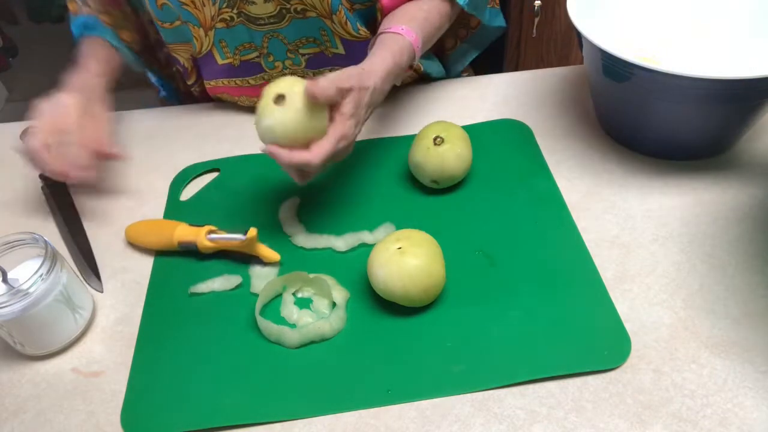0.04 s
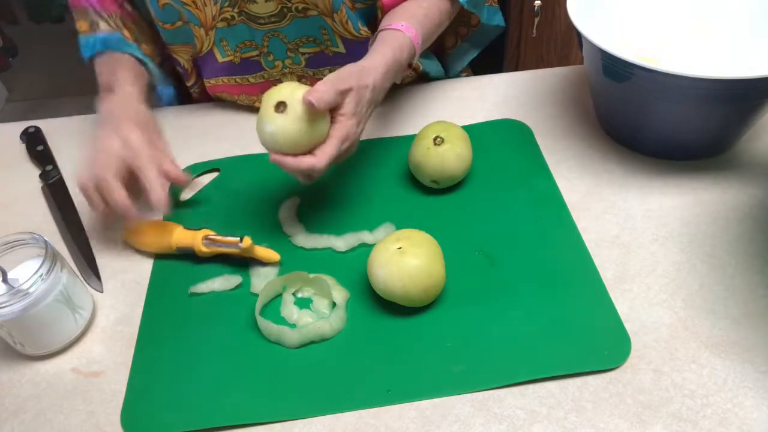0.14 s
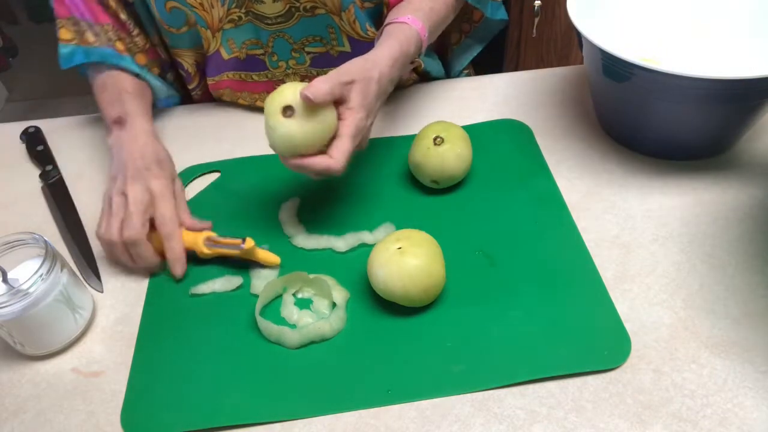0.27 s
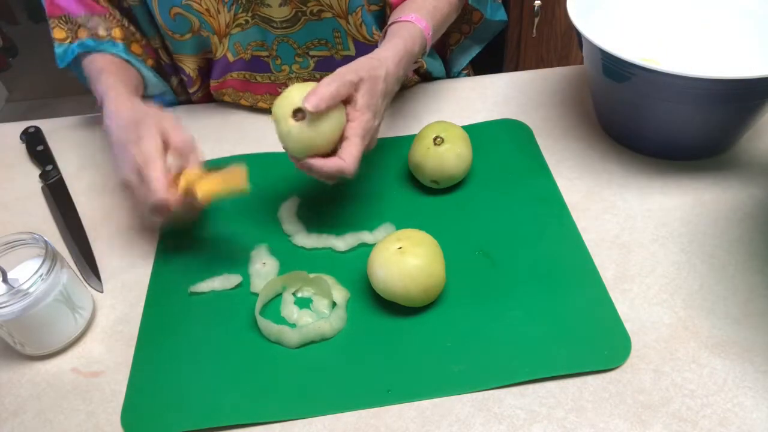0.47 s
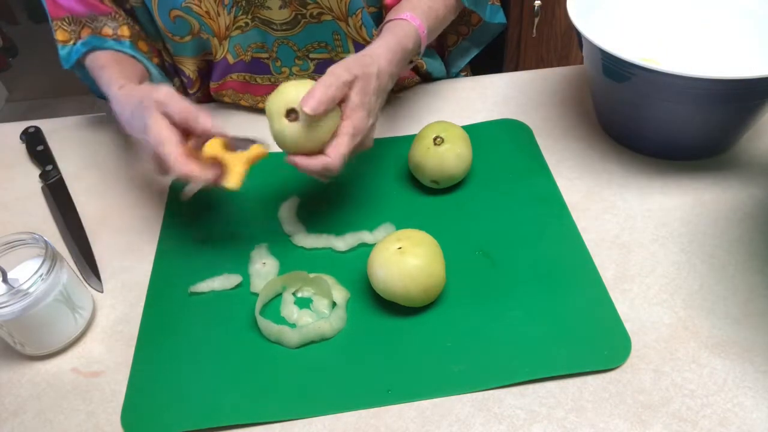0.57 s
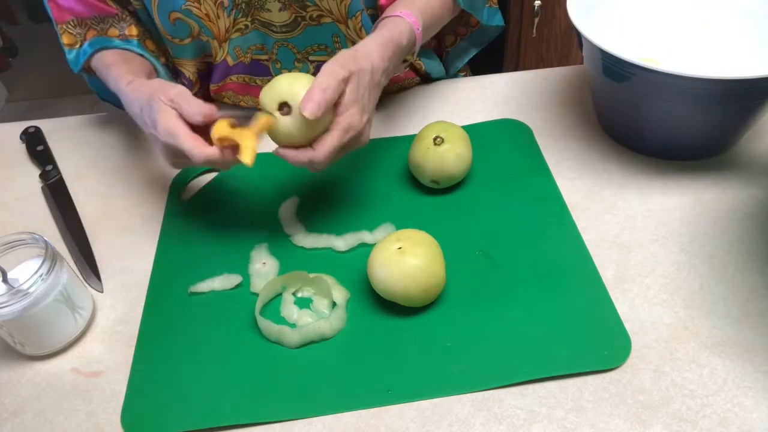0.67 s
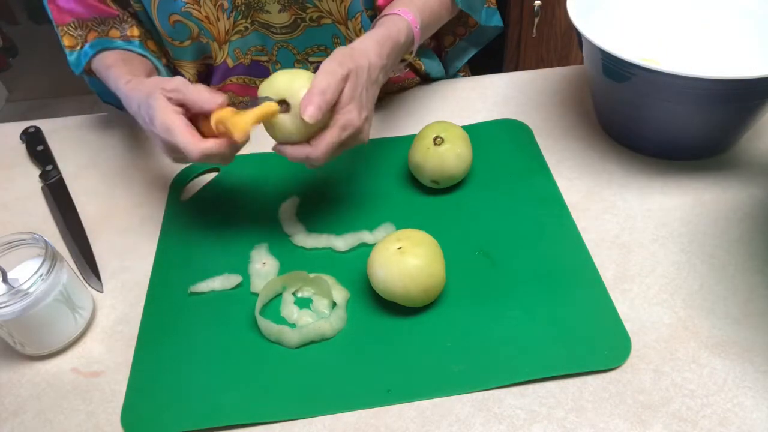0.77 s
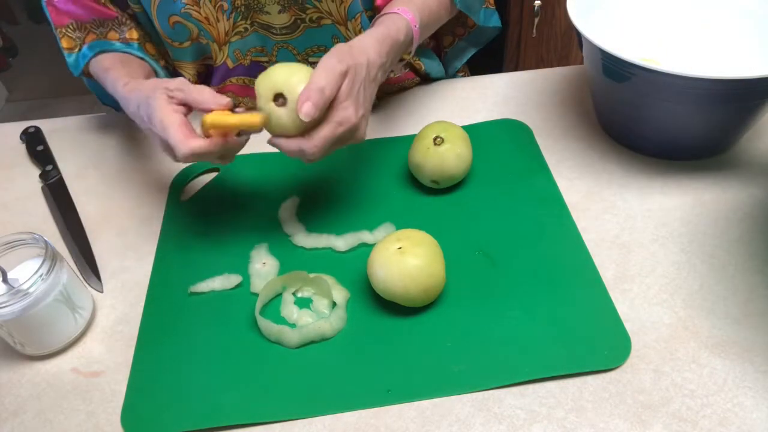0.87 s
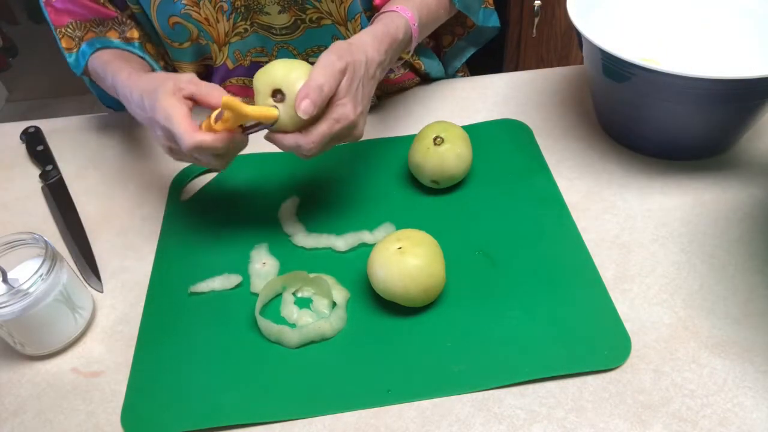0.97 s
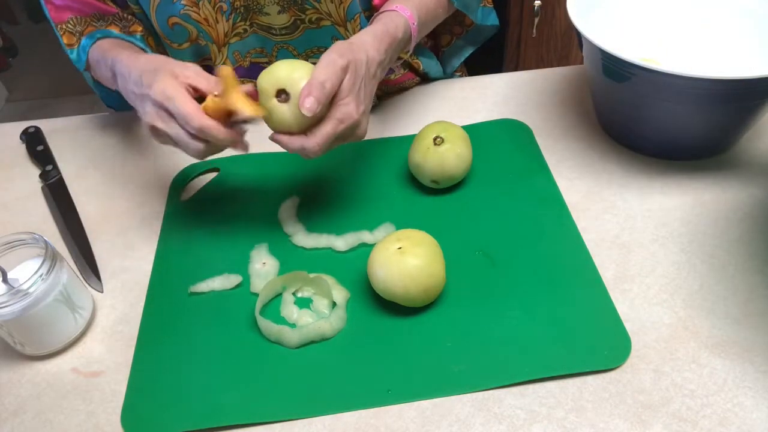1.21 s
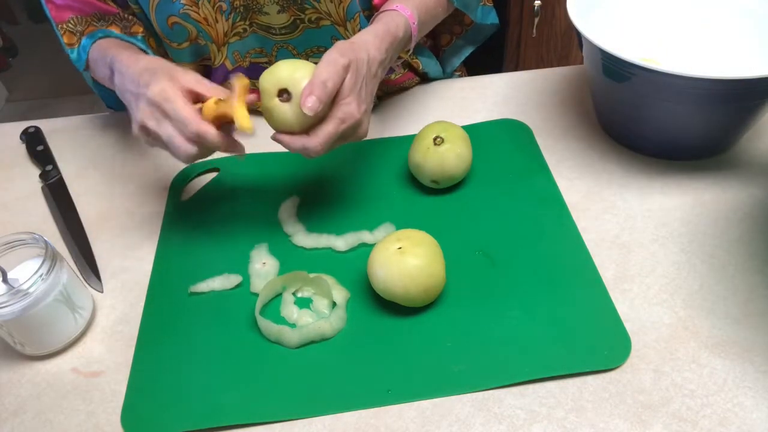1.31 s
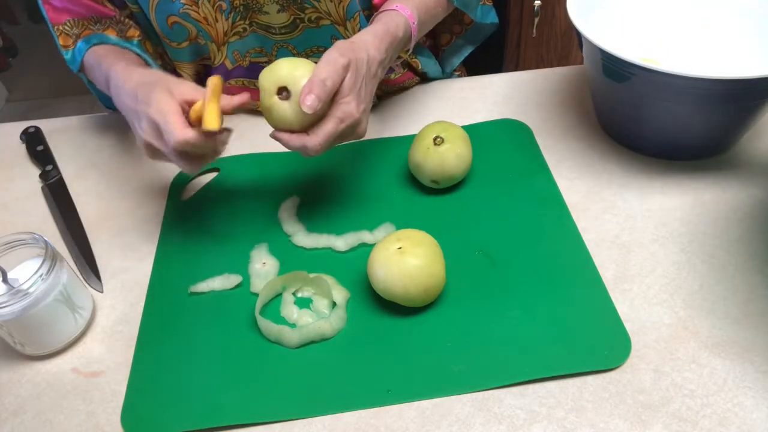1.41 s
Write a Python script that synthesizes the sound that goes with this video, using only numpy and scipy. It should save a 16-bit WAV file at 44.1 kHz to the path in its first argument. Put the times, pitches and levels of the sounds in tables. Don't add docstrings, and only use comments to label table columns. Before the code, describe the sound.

Peeler lifted from a board: sharp clack, tiny squeak, then faint metallic blade ticks in hand

```python
import sys
import numpy as np
from scipy import signal
from scipy.fft import rfft, irfft
from scipy.io import wavfile
from scipy.ndimage import uniform_filter1d

SR = 44100
rng = np.random.default_rng(int(sys.argv[2]) if len(sys.argv) > 2 else 0)


def level_to_linear(level):
    exponent = np.asarray(level, float) / 20
    return 10 ** exponent


def transcribe(signal):
    frames = np.atleast_2d(signal).T
    limited = np.clip(frames, -1, 1)
    pcm = np.round(limited * 32767).astype(np.int16)
    wavfile.write(sys.argv[1], SR, pcm)


N = 63945
T = np.arange(N) / SR

# [t/s, level/dB, crack level/dB]
KNOCKS = [
    (.2163, -30, -27),
    (.2174, -21, -34),
    (.2218, -27, -36),
    (.2275, -32, -46),
    (.2415, -38, -38),
    (.2535, -31, -36),
    (.265, -35, -44),
    (.282, -42, -60),
]
# [f/Hz, level/dB, T60/s]
BOARD_MODES = [(890, -26, 0.047), (1121, 2, 0.023), (1300, -2, 0.071), (1804, -15, 0.075),
               (2000, -10.5, 0.019), (2500, -26, 0.015), (3210, -9, 0.011), (3580, -25, 0.0097),
               (4650, -13.5, 0.024), (5880, -13.5, .008), (7250, -23, 0.021), (9700, -34, 0.0031)]
BOARD_DB, KNOCK_SPREAD_DB, KNOCK_DETUNE = -4, 2, .025
BEND_CYCLES = 0.35
CRACK_DB, CRACK_S, CRACK_HZ = -3.5, 0.00088, 3270

# [t/s, level/dB]
THUMPS = [
    (.2185, -34),
    (.2265, -43),
    (.254, -37),
    (.278, -43),
]
# [f/Hz, level/dB, T60/s]
COUNTER_MODES = [(151.6, 1, 0.069), (261, -2, 0.061), (351.6, 2, 0.049), (550, -5.5, 0.027)]

# [t/s, slip rate f/Hz, level/dB]
SQUEAK = [
    (.2405, 1100, -40),
    (.2432, 1220, -29),
    (.2447, 1380, -20),
    (.2478, 1480, -17.5),
    (.2497, 1530, -21),
    (.2518, 1520, -32),
    (.2547, 1400, -20),
    (.2568, 1490, -29),
    (.265, 1520, -38),
]
HARMONIC_DB = [-20.5, -21, -17.5, -23]
SQUEAK_JITTER, SHRILL_ABOVE_HZ, SHRILL_SPAN_HZ = 0.034, 1430, 122
SQUEAK_DRY_SHARE = .6

# [f/Hz, bandwidth/Hz, level/dB]
SQUEAK_TAIL = [(1508, 44, -2.5), (1558, 95, -6), (1152, 126, -6), (2090, 55, -21), (1286, 150, -10)]
SQUEAK_TAIL_S, SQUEAK_TAIL_DB, SQUEAK_TAIL_T60_S = .258, -41, .38

# [t/s, level/dB, f/Hz]
RATTLES = [(0.2173, -29, 3920), (0.238, -32, 1340), (.241, -28.5, 1970), (.2425, -32, 3970),
           (.2455, -45, 3600), (0.2486, -42, 3120), (.2515, -39, 2000), (0.2533, -34, 1990),
           (0.2533, -43, 4580), (0.2551, -27.5, 1120), (.281, -38, 1190), (0.543, -45, 5760),
           (.5503, -41, 4860), (.559, -40, 5150), (0.5623, -36, 7700), (.5645, -46, 3310),
           (.567, -36.5, 3260), (0.5688, -36, 7700), (0.571, -42, 3320), (0.5713, -36, 5440),
           (0.7313, -54, 4220), (0.7424, -55, 1137), (0.744, -47, 3640), (0.7472, -53, 5240),
           (.7505, -46, 5200), (0.753, -49, 3780), (0.758, -44, 4020), (0.762, -51, 5100),
           (.7638, -42.5, 3750), (.7663, -53, 6500), (.7712, -43, 6000), (0.773, -40, 5230),
           (.7762, -53, 5800), (0.787, -53, 5100), (.7962, -44, 4600), (.803, -42, 5400),
           (0.8107, -54, 5300), (.8135, -48, 5100), (.9982, -62, 4600), (1.0185, -52, 5070),
           (1.025, -52, 5080), (1.025, -54, 1300), (1.0308, -50, 4850), (1.0302, -55, 1100),
           (1.034, -52.5, 3420), (1.039, -51.5, 4800), (1.0388, -54, 1070), (1.047, -61, 3100),
           (1.215, -46, 8800), (1.216, -52, 6800), (1.218, -57, 2530), (1.263, -53, 3570),
           (1.2705, -51, 4430), (1.2755, -56, 6500), (1.3712, -53, 2470), (.887, -51, 3630),
           (0.5147, -50, 3700), (.2172, -39, 4750)]
RATTLE_CYCLES, RATTLE_CLICK_S, RATTLE_CLICK_DB, RATTLE_BODY_DB = 40, 0.00095, -7.5, -2

# [t/s, level/dB, length/s, centre f/Hz]
SCRAPES = [(0.083, -66.5, 0.052, 2520), (0.174, -57, 0.15, 1300), (0.2377, -40.5, 0.016, 3300),
           (0.368, -63, 0.03, 4600), (0.4388, -58, 0.0072, 6200), (0.48, -60, 0.0046, 6900),
           (0.489, -58, 0.028, 6000), (0.508, -54, 0.016, 5040), (0.539, -56, 0.007, 5750),
           (0.551, -60, 0.004, 5400), (0.5583, -49, 0.0074, 5500), (0.5662, -43.5, 0.005, 4760),
           (.669, -61.5, 0.0069, 4240), (0.683, -57, 0.0099, 6500), (0.731, -57, 0.0019, 4530),
           (0.7405, -55, 0.017, 4140), (0.7564, -49, 0.019, 6200), (0.792, -57.5, 0.017, 5650),
           (0.808, -51.5, 0.0056, 6500), (0.8634, -63, 0.0023, 3750), (0.871, -60, 0.02, 4080),
           (1.013, -68, 0.037, 4270), (1.087, -70, 0.029, 2600), (1.213, -60, 0.0061, 7040),
           (1.262, -55.5, 0.02, 6000), (1.338, -66, 0.0018, 13000), (1.368, -61.5, 0.01, 4750),
           (1.402, -67.5, 0.026, 9700), (0.452, -66, 0.012, 5870), (0.775, -60, 0.013, 5050)]
GRAINS_PER_S, GRAIN_DB, SCRAPE_WIDTH, RELEASE_S = 3500, 5, 0.67, 0.006
# [f/Hz, bandwidth/Hz, level/dB]
CHATTER = [(2444, 260, 4), (3120, 170, -5), (3630, 360, -5.5), (4820, 58, -9.5), (5320, 110, -6),
           (6500, 63, -18), (7500, 91, -32), (8460, 41, -9), (11000, 180, -16), (14600, 250, -21)]
CHATTER_DB, CHATTER_SPREAD_DB, SAG_DB = -4, 3, -6.5

# [t/s, level/dB]
TICKS = [(0.37, -56), (0.44, -63), (0.4813, -45.5), (0.489, -44), (0.511, -52), (0.5506, -53),
         (0.682, -43.5), (.7315, -66), (0.748, -43), (0.764, -33), (.772, -50), (0.796, -56), (0.8098, -49),
         (0.8764, -40.5), (.8845, -63), (.998, -60), (1.031, -47), (1.0182, -76), (1.04, -55), (1.217, -44),
         (1.267, -37), (1.271, -61), (1.279, -46.5), (1.418, -42.5), (1.4201, -49)]
TICK_HZ, TICK_WIDTH_HZ, TICK_S = 5500, 4500, .0007
# [f/Hz, T60/s]
BLADE_MODES = [(2490, .045), (3750, .05), (4790, .06), (5185, .065), (5696, .24), (6450, .045), (8580, .03),
               (9165, .3), (9776, .09), (14170, .14), (15580, .15), (6800, .08)]
# [t/s, mode number from 0, level/dB]
PINGS = [(.25, 7, -77), (.441, 11, -75), (.441, 1, -71), (0.443, 6, -66), (.481, 5, -60), (.481, 9, -68),
         (.481, 10, -74), (.494, 3, -56), (.512, 9, -84), (.59, 4, -59.5), (.682, 10, -72), (.747, 3, -47),
         (.747, 1, -63), (.762, 10, -65), (.796, 2, -57), (.813, 3, -60), (.81, 9, -68), (.877, 5, -54.5),
         (0.878, 8, -58), (.877, 9, -67), (.885, 7, -70), (.905, 3, -66), (.905, 4, -69.5),
         (1.217, 0, -55.5), (1.272, 9, -70), (1.29, 4, -80), (1.372, 0, -55), (1.37, 9, -82),
         (.195, 0, -74), (.262, 2, -65)]
PING_ROUGH_DB = 3.5

# [f/Hz, bandwidth/Hz, level/dB]
KNIFE = [(604, 123, 1.5), (410, 140, -4.5), (880, 1360, -5), (2200, 2800, -13), (6000, 6500, -14),
         (12000, 7900, -22)]
KNIFE_DB, KNIFE_T60_S = -51.5, 0.32

# [f/Hz, level/dB per Hz]
AIR = [(30, -28), (60, -1.5), (90, -5.5), (280, 1), (750, -4.5), (1050, -11), (5500, -24), (15500, -36.5)]
AIR_DB = -60
# [f/Hz, level/dB]
HUM = [(60, -74), (119, -67.5)]

ROOM_T60_S, ROOM_TOP_T60_S, ROOM_DB, ROOM_TOP_DB, ROOM_GAP_S = 0.52, 0.33, -18.5, 4.5, 0.0015
MIC_LOW_HZ, MIC_TOP_HZ = 46.4, 15300


def unit(x):
    return x / np.sqrt(np.mean(x ** 2))


def band(x, hz, width_hz):
    hz = min(hz, .4 * SR)
    return signal.lfilter(*signal.iirpeak(hz, hz / min(width_hz, .3 * SR), SR), x)


def ring(start, hz, t60, rise=1e-5):
    u = np.maximum(T - start, 0)
    decay = np.exp(-np.log(1000) * u / t60)
    return np.sin(2 * np.pi * hz * u) * decay * (1 - np.exp(-(u / rise) ** 2))


def walk(rate):
    k = int(SR / rate)
    return unit(uniform_filter1d(uniform_filter1d(rng.standard_normal(N), k), k))


def burst_train(events, decay_s):
    envelope = sum(level_to_linear(db) * (T > s) * np.exp(-np.maximum(T - s, 0) / decay_s) for s, db in events)
    return envelope * np.sign(rng.standard_normal(N))


def board():
    out = np.zeros(N)
    for start, db, _ in KNOCKS:
        for hz, mode_db, t60 in BOARD_MODES:
            level_draw, pitch_draw = rng.standard_normal(2)
            level = level_to_linear(db + mode_db + BOARD_DB + KNOCK_SPREAD_DB * level_draw)
            out += level * ring(start, hz * (1 + KNOCK_DETUNE * pitch_draw), t60, BEND_CYCLES / hz)
    return out


def counter():
    out = np.zeros(N)
    for start, db in THUMPS:
        for hz, mode_db, t60 in COUNTER_MODES:
            out += level_to_linear(db + mode_db + 2 * rng.standard_normal()) * ring(start, hz, t60, 1 / hz)
    return out


def crack():
    x = burst_train([(s, db + CRACK_DB) for s, _, db in KNOCKS], CRACK_S)
    return 2.7 * band(band(x, CRACK_HZ, 5700), CRACK_HZ, 1800)


def squeak():
    s, hz, db = np.array(SQUEAK).T
    f = np.interp(T, s, hz)
    phase = 2 * np.pi * np.cumsum(f * (1 + SQUEAK_JITTER * walk(960))) / SR
    harmonics = sum(level_to_linear(g + 2 * walk(490)) * np.sin(k * phase) for k, g in enumerate(HARMONIC_DB, 2))
    shrillness = np.clip((f - SHRILL_ABOVE_HZ) / SHRILL_SPAN_HZ, 0, 1)
    return (np.sin(phase) + harmonics * shrillness) * level_to_linear(np.interp(T, s, db, -150, -150))


def squeak_tail():
    x = sum(level_to_linear(db) * unit(band(band(rng.standard_normal(N), f, w), f, 2 * w)) for f, w, db in SQUEAK_TAIL)
    u = T - SQUEAK_TAIL_S
    return x * np.clip(u / 0.0043, 0, 1) * level_to_linear(SQUEAK_TAIL_DB - 60 * u.clip(0) / SQUEAK_TAIL_T60_S)


def rattles():
    noise = np.sign(rng.standard_normal(N))
    out, n = np.zeros(N + SR), SR // 20
    for s, db, hz in RATTLES:
        i = int(s * SR)
        click = band(noise[i:i + n] * np.exp(-T[:n] / RATTLE_CLICK_S), hz, hz) * level_to_linear(RATTLE_CLICK_DB)
        body = np.zeros(n)
        for f, w, d in CHATTER:
            level = level_to_linear(RATTLE_BODY_DB + d + 1.8 * rng.standard_normal())
            body += level * np.sqrt(hz / w) * band(click, f, w)
        own_ring = ring(0, hz, RATTLE_CYCLES / hz, 1 / hz)[:n]
        out[i:i + n] += level_to_linear(db) * (click + body + own_ring)
    return out[:N]


def scrapes():
    out, n = np.zeros(N + SR), SR // 5
    t = T[:n]
    for s, db, length, hz in SCRAPES:
        chance, size, sign = rng.random((3, n))
        spread = CHATTER_SPREAD_DB * rng.standard_normal(len(CHATTER))
        grains = (chance < GRAINS_PER_S / SR) * level_to_linear(GRAIN_DB * 1.93 * size) * np.sign(sign - .5)
        grains = grains + .5 * rng.standard_normal(n)
        rub = unit(band(band(grains, hz, SCRAPE_WIDTH * hz), hz, 1.68 * hz))
        rub = rub * level_to_linear(db + 1.5 * walk(630)[:n] + SAG_DB * np.clip(t / length, 0, 1))
        rub = rub * np.clip(t / length / 0.21, 0, 1) * np.exp(-np.maximum(t - length, 0) / RELEASE_S)
        body = np.zeros(n)
        for (f, w, d), change in zip(CHATTER, spread):
            body += level_to_linear(CHATTER_DB + d + change) * np.sqrt(hz / w) / 2 * band(rub, f, w)
        i = int(s * SR)
        out[i:i + n] += rub + body
    return out[:N]


def blade():
    ticks = band(band(burst_train(TICKS, TICK_S), TICK_HZ, TICK_WIDTH_HZ), TICK_HZ, 14000)
    rough = [level_to_linear(PING_ROUGH_DB * walk(150)) for _ in BLADE_MODES]
    pings = np.zeros(N)
    for s, number, db in PINGS:
        k = int(round(number))
        pings += level_to_linear(db) * rough[k] * ring(s, *BLADE_MODES[k])
    return ticks + pings


def knife():
    x = sum(level_to_linear(db) * unit(band(band(rng.standard_normal(N), f, w), f, w)) for f, w, db in KNIFE)
    return np.roll(x, N // 2) * level_to_linear(KNIFE_DB - 60 * T / KNIFE_T60_S)


def air():
    f = np.fft.rfftfreq(N, 1 / SR) + 1
    hz, db = np.array(AIR).T
    spectrum = rfft(rng.standard_normal(N)) * level_to_linear(np.interp(np.log(f), np.log(hz), db))
    out = np.zeros(N)
    for centre in 30 * 2 ** np.arange(0, 9.6, .5):
        weight = np.clip(1 - abs(2 * np.log2(f / centre)), 0, 1)
        out += irfft(spectrum * weight, N) * level_to_linear(1.2 * walk(9))
    return unit(out) * level_to_linear(AIR_DB)


def fridge():
    out = np.zeros(N)
    for hz, db in HUM:
        level = level_to_linear(db + 1.5 + 2 * walk(30))
        cycles = hz * np.cumsum(1 + 0.015 * walk(8)) / SR
        out += level * np.sin(2 * np.pi * cycles)
    return out


def room(x):
    u = T[:SR // 2]
    low = signal.lfilter(*signal.butter(1, 2500, "low", fs=SR), rng.standard_normal(len(u)))
    top = signal.lfilter(*signal.butter(1, 2500, "high", fs=SR), rng.standard_normal(len(u)))
    low_tail = low * level_to_linear(-60 * u / ROOM_T60_S)
    top_tail = top * level_to_linear(ROOM_TOP_DB - 60 * u / ROOM_TOP_T60_S)
    tail = (low_tail + top_tail) * (u > ROOM_GAP_S) / np.sqrt(np.sum(low_tail ** 2))
    return x + level_to_linear(ROOM_DB) * signal.fftconvolve(x, tail)[:N]


def scene():
    knocks = board() + counter() + crack()
    squeal = squeak()
    rub = knocks + (1 - SQUEAK_DRY_SHARE) * squeal + scrapes() + blade()
    background = knife() + air() + fridge()
    peeler = room(rub + rattles())
    return (peeler + SQUEAK_DRY_SHARE * squeal + squeak_tail() + background)[None]


def band_limit(x):
    return signal.sosfilt(signal.butter(12, 16500, fs=SR, output="sos"), x)


def record(dry):
    x = signal.sosfilt(signal.butter(3, MIC_LOW_HZ, "high", fs=SR, output="sos"), dry)
    mix = signal.sosfilt(signal.butter(10, MIC_TOP_HZ, fs=SR, output="sos"), x)
    return band_limit(mix)


dry = scene()
out = record(dry)
transcribe(out)
```